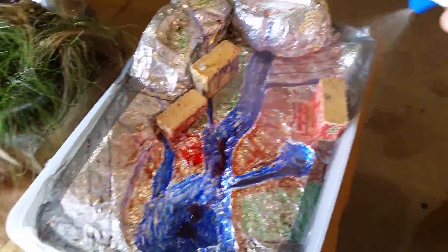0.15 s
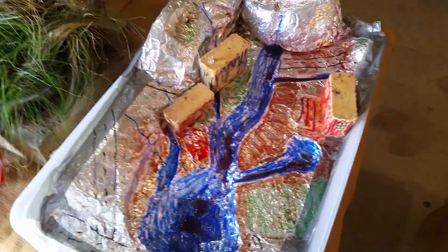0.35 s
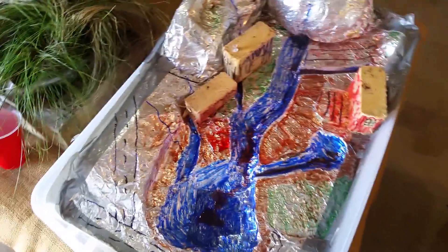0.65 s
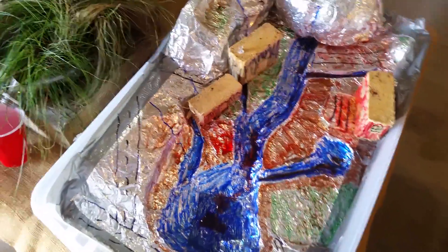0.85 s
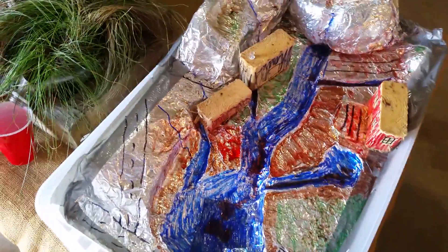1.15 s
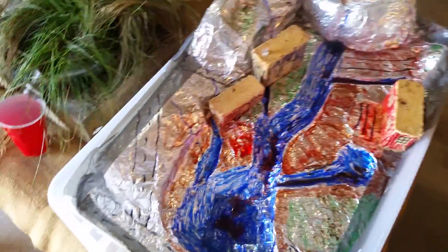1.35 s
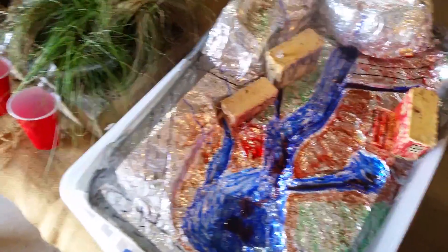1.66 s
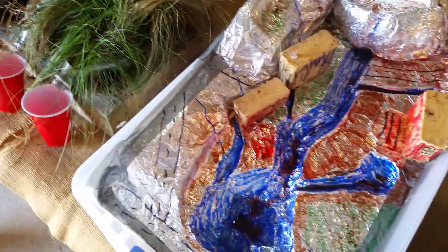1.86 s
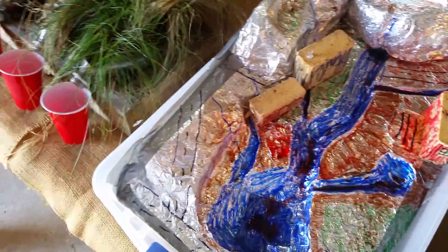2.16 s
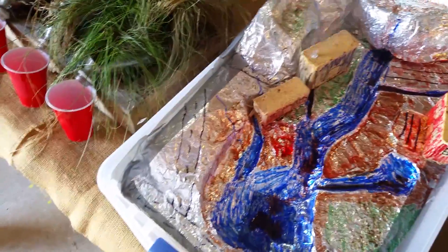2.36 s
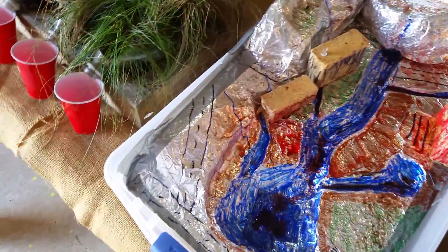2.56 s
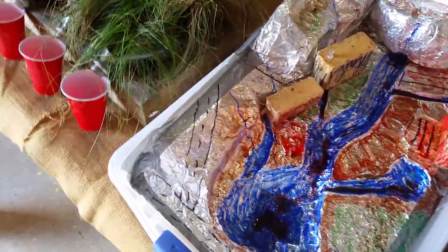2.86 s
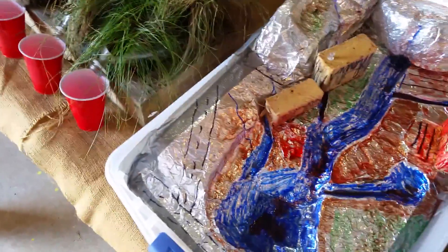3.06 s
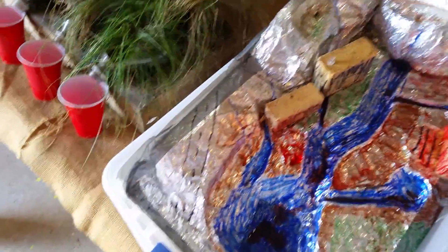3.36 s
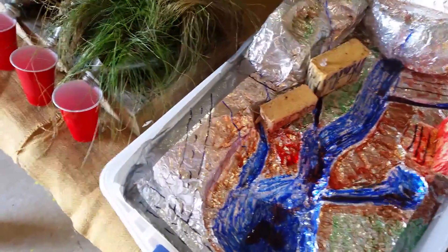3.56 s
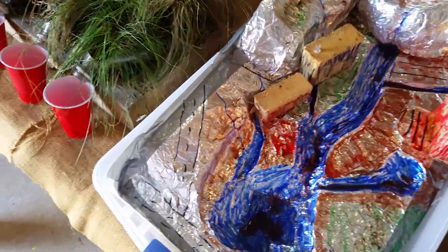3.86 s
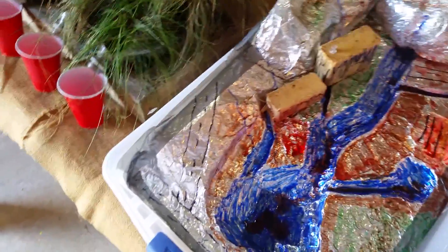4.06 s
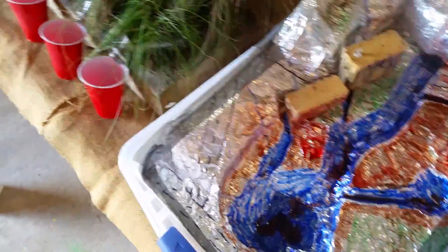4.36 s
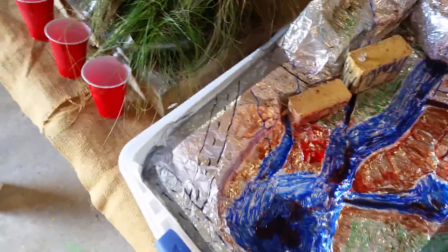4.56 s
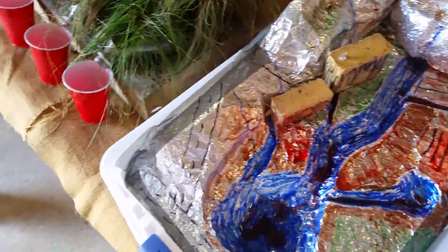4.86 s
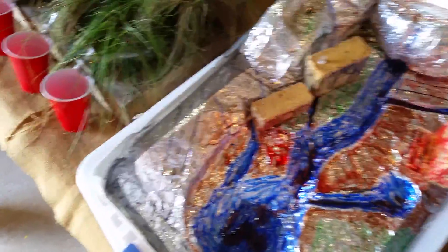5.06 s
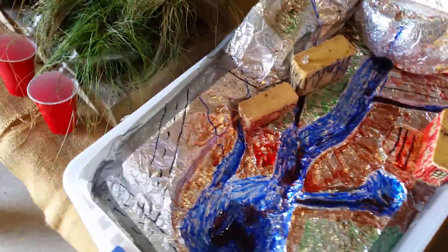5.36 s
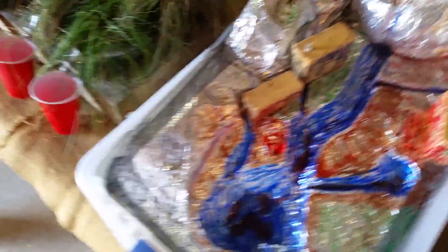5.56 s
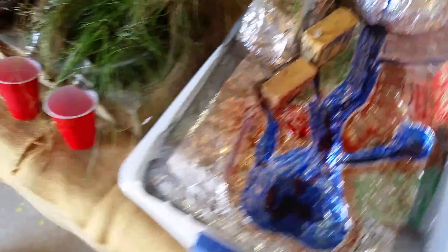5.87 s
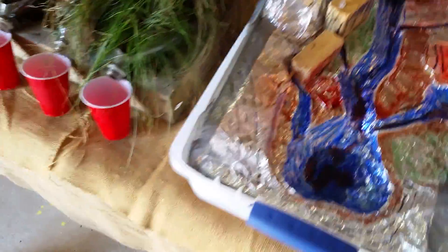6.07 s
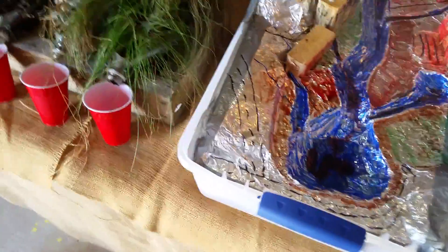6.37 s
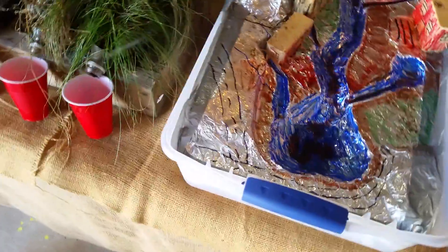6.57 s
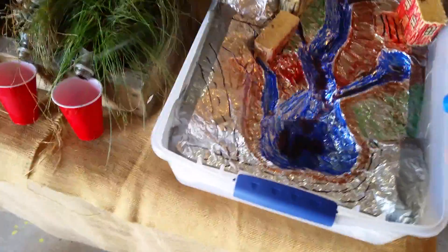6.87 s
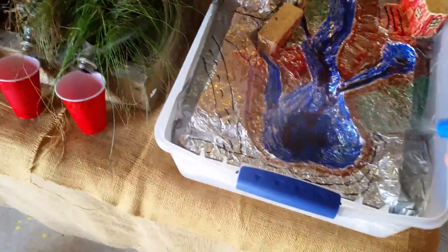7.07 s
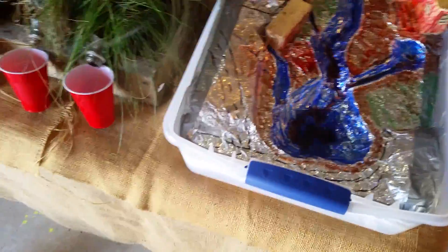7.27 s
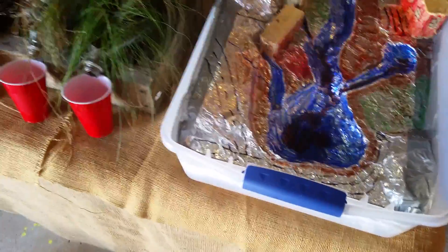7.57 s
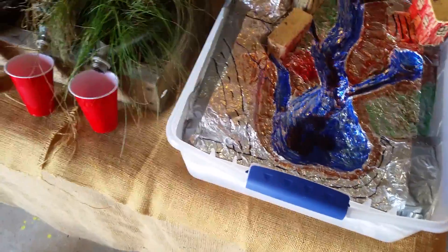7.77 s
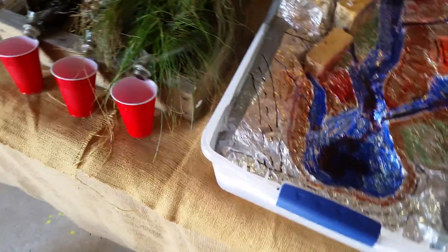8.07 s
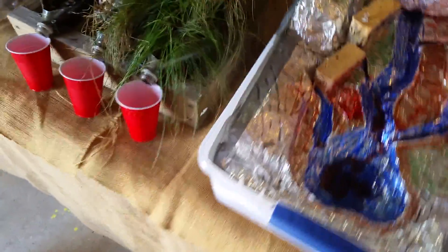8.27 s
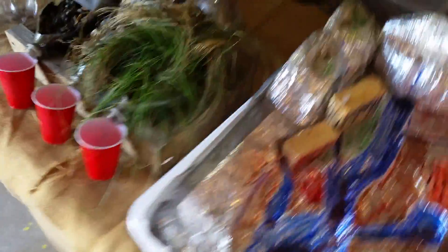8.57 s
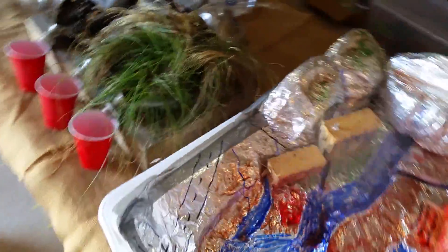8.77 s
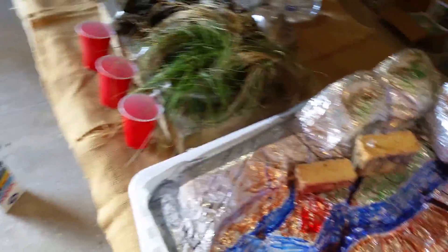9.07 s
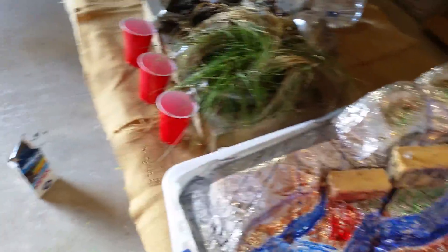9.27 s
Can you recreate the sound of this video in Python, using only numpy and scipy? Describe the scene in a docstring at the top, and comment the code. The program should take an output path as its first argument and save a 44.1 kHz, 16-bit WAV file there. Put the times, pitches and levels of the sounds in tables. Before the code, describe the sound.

A hand-pumped spray bottle works close to the microphones over a foil-lined plastic tub in a large indoor hall. From 0.15 to 9.2 seconds come twenty-four squirts, roughly 0.35 to 0.55 seconds apart. Each starts as a faint dribble, swells into a sharp, grainy hiss and stops within about a tenth of a second, with a tiny plastic tick at the press and another as the trigger springs back. The first three are strong; they weaken until about 3 to 5.5 seconds, recover by 7, and finish forcefully with clearer clicks around 8.8 and 9.2. A short crinkling scuff occurs near 9.15. The spray is bright on the left, much weaker and thin on the right, with short reflections and diffuse reverberation. Beneath lies wavering low rumble and ventilation hum, quieter midway and fuller at the end, while a faint far motor slowly rises in pitch from about 3 seconds.

```python
"""Two dozen spray hisses, each with a plastic tick, are heard in a large, humming hall.
A trigger bottle is pumped over a foil-lined tub: each hiss swells and stops as the piston bottoms out.
The hiss is shaped noise plus tiny droplet impacts; the ticks are short noise snaps ringing the plastic.
The left microphone faces the nozzle; the right one is shadowed and hears mostly its own port's resonance.
Noise and wavering tones make the hall's air and machines; fading noise makes its reverberation."""
import sys
import numpy as np
from scipy import signal
from scipy.fft import rfft, irfft, next_fast_len
from scipy.io import wavfile
from scipy.ndimage import uniform_filter1d

SR = 44100
rng = np.random.default_rng(int(sys.argv[2]) if len(sys.argv) > 2 else 0)


def wav_out(sig):
    """Save sig, one row per channel (or a flat mono array), as 16-bit PCM at SR to the path in sys.argv[1]."""
    wavfile.write(sys.argv[1], SR, np.round(np.clip(np.atleast_2d(sig).T, -1, 1) * 32767).astype(np.int16))


N = 415863   # samples in the whole scene

# trigger pulls: (pressed at [s], valve pops open after [s], whole stroke [s], release [s],
# jet level against the jet tables [dB], trigger tick level [dB])
PULLS = [(.147, 0.089, 0.11, 0.017, 8.5, -41), (.510, 0.093, 0.12, .013, 7, -38),
         (.902, 0.085, 0.096, 0.0099, 6.5, -38), (1.264, 0.061, 0.097, 0.011, 3.5, -55),
         (1.632, .062, 0.1, 0.01, 3.5, -45), (2.000, 0.069, 0.1, .014, 2, -52),
         (2.368, 0.068, 0.092, 0.017, .5, -57), (2.733, 0.054, 0.094, 0.017, -1, -50),
         (3.081, .061, 0.1, 0.015, -2.5, -57), (3.431, .060, 0.093, 0.014, -.5, -50.5),
         (3.940, 0.065, 0.095, 0.018, -3, -65), (4.363, 0.052, 0.091, 0.014, -1.5, -50.5),
         (4.785, 0.037, 0.1, 0.011, -1, -52.5), (5.137, .063, 0.089, 0.014, -2.5, -51),
         (5.497, 0.057, 0.098, 0.0093, -0.5, -50), (5.884, 0.06, .100, 0.0089, -1, -61),
         (6.311, .062, 0.11, .012, 2, -55), (6.683, 0.068, 0.12, 0.011, 4.5, -41),
         (7.055, 0.057, 0.11, .011, 6, -52), (7.447, 0.09, 0.14, 0.0071, 5, -52),
         (7.985, 0.085, 0.12, 0.027, 2, -64), (8.430, 0.078, 0.15, 0.03, 4.5, -62),
         (8.823, .062, 0.1, 0.025, 8, -32), (9.183, 0.057, 0.1, 0.024, 6.5, -34)]
# the jet at each microphone, before pull and aim change it: (frequency [Hz], density [dB per Hz])
JET_LEFT = [(200, -100), (550, -101.5), (850, -79), (1200, -81), (1700, -73.5), (2800, -72), (5000, -71),
            (8500, -66.5), (9500, -71.5), (11500, -68.5), (13500, -72.5), (15800, -72)]
JET_RIGHT = [(200, -102), (800, -88.5), (1250, -87.5), (1800, -86.5), (2800, -90), (4000, -88.5),
             (5200, -93), (7000, -92), (9500, -84), (11500, -77), (13500, -69), (15600, -63.5)]
# how much of the hall's sound reaches the microphones: (frequency [Hz], reflected share [dB])
HALL_WET = [(500, -1.5), (1600, -6.5), (2500, -8.5), (3500, -12), (4800, -10), (6500, -17), (8300, -19),
            (10000, -25.5), (12500, -28), (16000, -28)]


def from_db(db):
    """Turn decibels into an amplitude factor."""
    return 10 ** (np.asarray(db) / 20)


def rms_one(x):
    """Scale a sound to an average strength (RMS) of 1."""
    return x / np.sqrt(np.mean(x ** 2) + 1e-20)


def at_hz(points, hz):
    """Read a spectrum table on a log-frequency axis."""
    table = np.array(points)
    return np.interp(np.log(hz + 1e-3), np.log(table[:, 0]), table[:, 1])


def in_time(rows):
    """Read each column of a time table at every sample."""
    s, *columns = np.transpose(rows)
    return [np.interp(np.arange(N) / SR, s, c) for c in columns]


def bins(size):
    """List the frequencies of a real spectrum."""
    return np.arange(size // 2 + 1) * SR / size


def colour(white, density_db):
    """Give unit white noise a density in dB per Hz."""
    spectrum = rfft(white) * from_db(density_db) * np.sqrt(SR / 2)
    return irfft(spectrum, white.shape[-1])


def drift(rate, size):
    """Wander slowly at random with spread 1; changes faster than the rate [Hz] are weakened."""
    padded = next_fast_len(size)
    spectrum = rfft(rng.standard_normal(padded))
    slow = irfft(spectrum / (1 + (bins(padded) / rate) ** 2), padded)
    return rms_one(slow[:size])


def resonate(x, hz, width_hz):
    """Ring like a hollow or a piece of plastic: a two-pole resonance with gain 1 on top."""
    r = np.exp(-np.pi * width_hz / SR)
    feed = np.array([1, 0, -1]) * (1 - r * r) / 2
    feedback = [1, -2 * r * np.cos(2 * np.pi * hz / SR), r * r]
    return signal.lfilter(feed, feedback, x)


def droplets(size, per_s, spread_db):
    """Make tiny impacts of uneven size, at random moments."""
    sizes = from_db(spread_db * np.minimum(rng.exponential(1, size), 4))
    signs = rng.choice([-1, 1], size)
    lands = rng.random(size) < per_s / SR
    return rms_one(sizes * signs * lands)


def hum(hz, db, waver=0.38):
    """A machine tone that wavers in strength and phase on its way through the hall."""
    phase = 2 * np.pi * np.cumsum(hz * np.ones(N)) / SR
    path = 1 + waver * (drift(2.7, N) + 1j * drift(1.2, N))
    return from_db(db) * rms_one(np.real(path * np.exp(1j * phase)))


def air(rumble_hz=110, hum_follow=0.99):
    """Diffuse roar of the hall with ventilation tones and a far motor; the rumble beneath swells on its own."""
    # air at each microphone, at the reference levels below: (frequency [Hz], density [dB per Hz])
    air_left = [(20, -75.5), (45, -76.5), (90, -72), (150, -75.5), (220, -81.5), (450, -80), (780, -81.5),
                (1300, -93), (2600, -93.5), (3100, -108), (4000, -109), (4700, -102), (8500, -109),
                (10500, -123)]
    air_right = [(20, -79), (45, -76), (90, -69), (150, -73.5), (220, -80), (450, -80.5), (750, -86),
                 (1300, -101), (2400, -109), (3400, -119), (8000, -125), (15500, -120)]
    # how alike the two sides are: (frequency [Hz], left-right likeness [-1 to 1])
    likeness = [(20, .7), (120, 0.81), (300, 0.72), (640, 0.57), (1400, .1), (4000, 0.15)]
    # low rumble, read against its reference: (time [s], level [dB])
    rumble_level = [(0, -53), (.5, -54), (1.1, -59), (2.5, -61), (3.8, -60), (4.8, -63.5), (6.55, -61.5),
                    (6.85, -55), (7.1, -59), (7.35, -49), (7.6, -53.5), (8.15, -55.5), (8.8, -46.5),
                    (9.43, -57)]
    # the hall's roar, read against its reference: (time [s], level [dB])
    roar_level = [(0, -48), (.88, -48), (1.05, -54.5), (1.9, -54), (2.03, -49.5), (2.35, -52.5),
                  (2.55, -56.5), (3.8, -55), (4.6, -58.5), (6.0, -56.5), (7.1, -52), (8.15, -49),
                  (9.0, -45), (9.43, -48.5)]
    # steady ventilation tones, before they follow the roar: (frequency [Hz], level [dB])
    vent_tones = [(28.0, -71.5), (58.5, -69), (117.0, -59.5), (327.0, -69)]
    # a far motor picks up speed: (time [s], frequency [Hz], level [dB])
    motor = [(0, 114, -75), (3.4, 116, -61), (5.0, 130.7, -67), (6.5, 144.8, -61.5), (7.9, 159, -60),
             (9.43, 164.5, -57.5)]
    rumble_ref_db, roar_ref_db = -53.5, -54
    hz = bins(N)
    rumble_db, roar_db = in_time(rumble_level) + in_time(roar_level)

    # both sides share one noise; a second one, with opposite signs, sets them apart
    alike = np.clip(at_hz(likeness, hz), -1, 1)
    mid, side = rfft(rng.standard_normal((2, N)))
    shared, apart = np.sqrt((1 + alike) / 2) * mid, np.sqrt((1 - alike) / 2) * side
    white = irfft(shared + apart * [[1], [-1]], N)
    roar = colour(white, np.array([at_hz(air_left, hz), at_hz(air_right, hz)]))
    rumble = irfft(rfft(roar) / (1 + (hz / rumble_hz) ** 8), N)

    swell_db = roar_db - roar_ref_db
    machines = sum(hum(tone_hz, db + hum_follow * swell_db) for tone_hz, db in vent_tones)
    machines = machines + hum(*in_time(motor))
    swelling_rumble = rumble * from_db(rumble_db - rumble_ref_db)
    return swelling_rumble + (roar - rumble) * from_db(swell_db) + machines


def lingering(db=5, right_db=-6, t60=0.61):
    """At the start the hall still rings with the hiss of an earlier pull: fading noise in the jet's colour."""
    hz, t = bins(N), np.arange(N) / SR
    jet_db = np.array([at_hz(JET_LEFT, hz), at_hz(JET_RIGHT, hz) + right_db])
    noise = colour(rng.standard_normal((2, N)), jet_db + at_hz(HALL_WET, hz))
    return noise * from_db(db - 60 * np.minimum(t / t60, 3))


def ticks(rebound=0.614, size=2048):
    """The trigger snaps when pressed and springing back, rebounds once and rings the head and right port."""
    # ringing parts of the spray head: (frequency [Hz], width [Hz], level within the head's mix [dB])
    head_modes = [(2300, 520, -9.5), (4530, 800, -12.5), (6660, 690, 5.5), (8030, 850, 6),
                  (13480, 5000, -18)]
    port_hz, port_width_hz = 15300, 1300
    return_s, return_tick_db = 0.15, -55   # delay after the stroke; tick at pull level 0
    press_right_db, return_right_db = -11.5, -5.5   # right microphone against the left
    decay_s, rebound_s, lasts_s = .0007, .0018, .003
    out, t = np.zeros((2, N + SR)), np.arange(size) / SR
    second_hit = (t > rebound_s) * np.exp(-abs(t - rebound_s) / decay_s)
    contact = np.exp(-t / decay_s) + rebound * second_hit
    for pressed, _, stroke, _, pull_db, tick_db in PULLS:
        press = (pressed, tick_db, press_right_db)
        spring_back = (pressed + stroke + return_s, pull_db + return_tick_db, return_right_db)
        for s, level_db, right_db in (press, spring_back):
            snap = contact * rng.standard_normal(size)
            head = 0
            for k, (hz, width, db) in enumerate(head_modes):
                head = head + from_db(db) * resonate(snap, hz, width) * (-1) ** k
            port = resonate(snap, port_hz, port_width_hz)
            at = round(s * SR)
            gains = from_db([[level_db], [level_db + right_db]])
            out[:, at:at + size] += gains * [rms_one(head), rms_one(port)]
    return out[:, :N] * np.sqrt(lasts_s * SR / size)   # levels hold for the few ms that a tick lasts


def aim(s):
    """The hand turns the nozzle, which colours the jet: read the setting at one moment."""
    # (time [s], nozzle resonance [Hz], coarse spray [dB], low rush [dB], right port [dB])
    nozzle_aim = [(.25, 8240, 6.5, -4, -3.5), (.65, 8540, 4, -6, -3), (1.0, 8030, -0.5, -3.5, -3),
                  (1.75, 9040, 0.5, -2, -3), (2.75, 8900, -1, -4.5, -2.5), (3.5, 7800, 1.5, -3.5, 0),
                  (4.0, 8430, 1.5, -1, -1), (5.0, 7100, -4, 2, 1), (5.898, 7150, 1, 3, -2),
                  (6.75, 8170, 3, 0, -2), (7.3, 7740, 1.5, 0.5, -4), (8.1, 8250, 5, 0, -3.5),
                  (8.55, 7000, 3.5, 4, -2), (9.3, 6570, -0.5, 7, -2)]
    times, *columns = np.transpose(nozzle_aim)
    return [np.interp(s, times, c) for c in columns]


def atomise(jet, pressure_db, fine_hz=9500, top_hz=14000, coarse_hz=5500, fade=0.92, dribble=0.34,
            splutter_db=1.0, splutter_hz=45):
    """High pressure makes fine mist; a weak jet is coarser, and its big drops come in splutters."""
    size = jet.shape[-1]
    spectrum, hz = rfft(jet), bins(size) + 1
    fine = irfft(spectrum / (1 + (fine_hz / hz) ** 16) / (1 + (hz / top_hz) ** 24), size)
    coarse = irfft(spectrum / (1 + (hz / coarse_hz) ** 8), size)
    fine_db = fade * pressure_db
    coarse_db = -dribble * pressure_db + splutter_db * drift(splutter_hz, size)
    return jet + fine * (from_db(fine_db) - 1) + coarse * (from_db(coarse_db) - 1)


def spray(depth_db=25, stiction_db=9, curve=1.54, spurt=0.13, spurt_s=.003, sputter_db=1.12,
          sputter_hz=110, grain=0.27, resonance_octaves=0.4, size=16384):
    """A dribble builds, the valve pops open, pressure holds and collapses; the jet is turbulence plus droplets."""
    slack_s, valve_jump_db = 0.013, 4   # trigger play before the piston moves; step as the valve opens
    full_share = 0.81   # share of every stroke at which full pressure is reached
    build_ease = 0.54   # a stronger pull starts from a stronger dribble: dB less build-up per dB of level
    top_db, top_at_hz, db_per_octave = 10, 6880, -9.5   # the nozzle resonance flattens as it rises
    out, hz = np.zeros((2, N + size)), bins(size)
    t = np.arange(size) / SR
    jet_db = np.array([at_hz(JET_LEFT, hz), at_hz(JET_RIGHT, hz)])
    coarse, low = 1 / (1 + (hz / 4500) ** 4), 1 / (1 + (hz / 2000) ** 6)
    for s, opens, stroke, release, db, _ in PULLS:
        open_for, full = t - opens, full_share * stroke
        opened = (1 + np.tanh(open_for / .002)) / 2
        # stored pressure gives a short spurt
        valve = opened * (1 + spurt * np.exp(-abs(open_for) / spurt_s)) - 1
        to_go = np.clip((full - t) / (full - slack_s), 0, 2)   # share of the build-up still ahead
        pressure_db = -(depth_db - build_ease * db) * to_go ** curve
        stuck = to_go ** 7   # the flow is held back further until the piston slips
        leak = np.exp(-np.maximum(t - stroke, 0) / release)   # pressure leaks away after the stroke
        flow = from_db(pressure_db - stiction_db * stuck + valve_jump_db * valve) * leak
        flow = flow * from_db(sputter_db * drift(sputter_hz, size))   # the sheet of water breaks up unevenly

        turbulence = rng.standard_normal((2, size))
        mist = rms_one(turbulence + grain * droplets(size, per_s=3000, spread_db=2))

        nozzle_hz, coarse_db, low_db, right_db = aim(s + full)
        peak_db = top_db + db_per_octave * np.log2(nozzle_hz / top_at_hz)
        octaves_off = np.log2((hz + 1) / nozzle_hz)
        nozzle = peak_db * np.exp(-abs(octaves_off / resonance_octaves) ** 2.5)
        port = right_db * (1 - coarse)
        tone_db = jet_db + db + coarse_db * coarse + low_db * low + [nozzle, port]   # left, right
        at = round(s * SR)
        out[:, at:at + size] += colour(flow * atomise(mist, pressure_db), tone_db)
    return out[:, :N]


def tub(x, echo_db=-20, sway_s=.00012, count=5):
    """The tub's hollow resonates; short reflections off the foil comb the hiss, shifting as the hand moves."""
    # the hollow answers as the jet is aimed into it: (time [s], resonance gain [dB])
    tub_aim = [(.25, -6), (.7, -20.5), (3, -23), (5.5, -36), (6.8, -5.5), (8.1, -11.5), (8.6, -10),
               (9.43, -4)]
    tub_hz, tub_width_hz = 1800, 230
    n = np.arange(N)
    lags = [SR * (rng.uniform(.0005, .005) + sway_s * drift(.7, N)) for k in range(count)]   # in samples
    echoes = np.array([sum(np.interp(n - lag, n, side) for lag in lags) for side in x])
    hollow = from_db(in_time(tub_aim)[0]) * resonate(x, tub_hz, tub_width_hz)
    return x + from_db(echo_db) * echoes + hollow


def hall(x, early_db=-18, early_t60=0.4, right_db=-3, size=256, count=3):
    """Diffuse reverberation: each band stores the energy it is fed and gives it back as fading noise."""
    # (frequency [Hz], time to fade by 60 dB [s])
    hall_t60 = [(500, 3.5), (2000, 0.57), (5000, 0.73), (8000, 0.48), (12000, 0.4), (16000, 0.4)]
    hz, frames, direct = signal.stft(x, SR, nperseg=size)
    energy = uniform_filter1d(abs(direct) ** 2, size=3, axis=1)
    fed = np.pad(energy, [(0, 0), (0, 0), (count, 0)])[..., :-count]   # delayed by count frames

    def fading(power, t60):
        """Let stored energy leak away by 60 dB in t60 seconds."""
        keep = from_db(-60 * frames[1] / t60) ** 2
        return signal.lfilter([1 - keep], [1, -keep], power + 1e-24)

    stored = np.zeros(fed.shape)
    for k, band_hz in enumerate(hz):
        near = from_db(early_db) ** 2 * fading(fed[:, k], early_t60)   # table and stall answer quickly
        share_db = at_hz(HALL_WET, band_hz) + np.array([[0], [right_db]])
        far = from_db(share_db) ** 2 * fading(fed[:, k], at_hz(hall_t60, band_hz))
        stored[:, k] = near + far
    diffuse = signal.stft(rng.standard_normal((2, N)), SR, nperseg=size)[2]
    reverberant = diffuse / diffuse.std() * np.sqrt(abs(stored))
    return signal.istft(reverberant, SR, nperseg=size)[1][:, :N]


def crinkles(right_db=-20):
    """Brief crinkles and scuffs of handling: clusters of tiny snaps, each filtered to its own band."""
    # (time of the peak [s], time from peak to 1/e [s], level [dB], frequency [Hz], width [Hz])
    scuffs = [(3.841, .002, -52, 3980, 4000), (9.129, 0.005, -37.5, 4170, 2400),
              (9.132, 0.016, -44, 2110, 900), (9.163, .002, -38, 4450, 1200),
              (9.167, 0.0016, -35, 7600, 5000), (9.17, 0.034, -42, 1470, 2400),
              (9.174, 0.0022, -38, 4600, 1200)]
    t, out = np.arange(N) / SR, np.zeros(N)
    snaps = droplets(N, per_s=17000, spread_db=2.5)
    for s, length, db, hz, width in scuffs:
        band = rms_one(resonate(resonate(snaps, hz, width), hz, width))
        out += from_db(db) * np.exp(-((t - s) / length) ** 2) * band
    return out * from_db([[0], [right_db]])


def scene():
    """The bottle close by, its reflections, and the hall behind."""
    bottle = spray() + ticks() + crinkles()
    return tub(bottle) + hall(bottle) + lingering() + air()


def record(dry):
    """Cut the top steeply above 15850 Hz."""
    steep_cut = signal.ellip(12, .1, 80, 15850, fs=SR, output="sos")
    return signal.sosfilt(steep_cut, dry)


dry = scene()
out = record(dry)
wav_out(out)
```